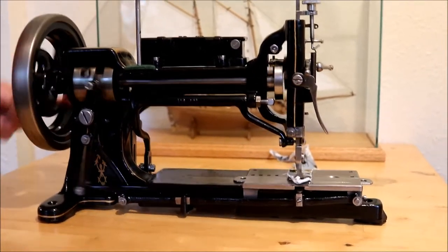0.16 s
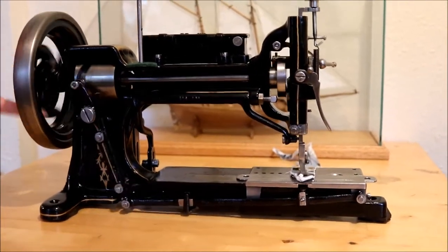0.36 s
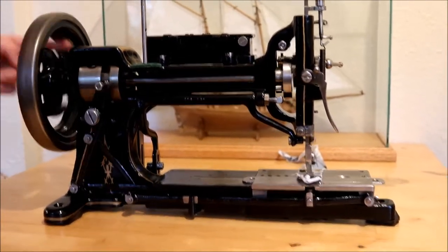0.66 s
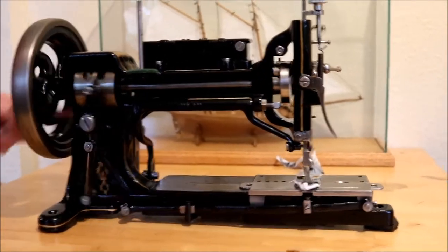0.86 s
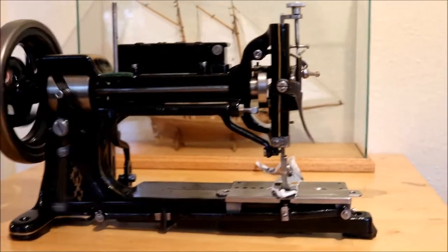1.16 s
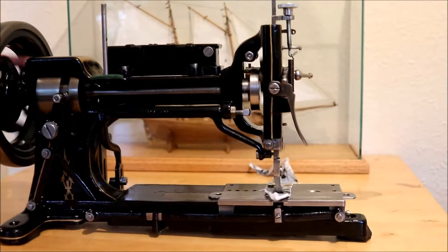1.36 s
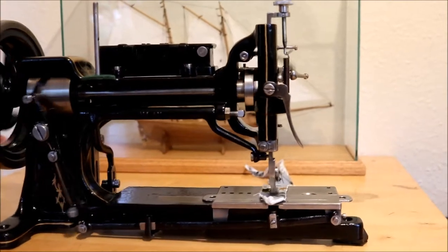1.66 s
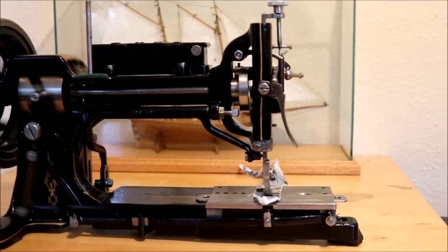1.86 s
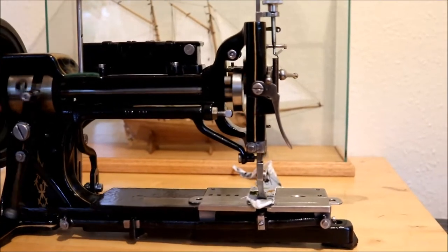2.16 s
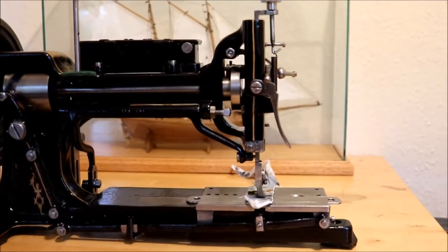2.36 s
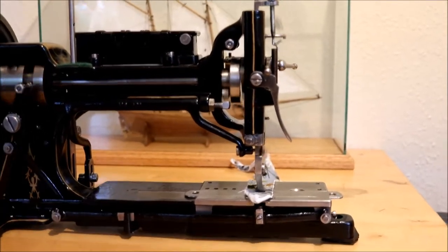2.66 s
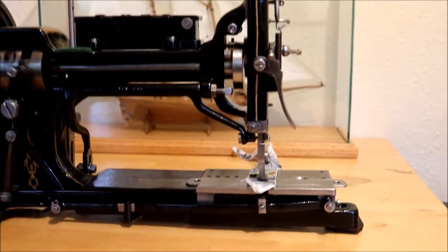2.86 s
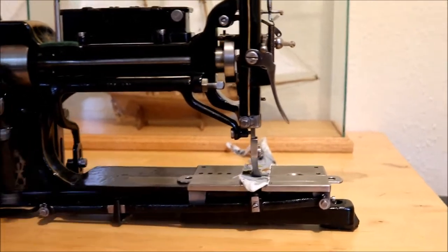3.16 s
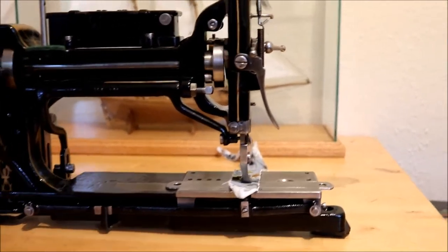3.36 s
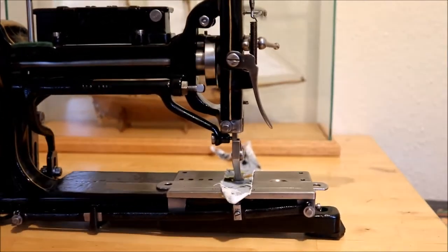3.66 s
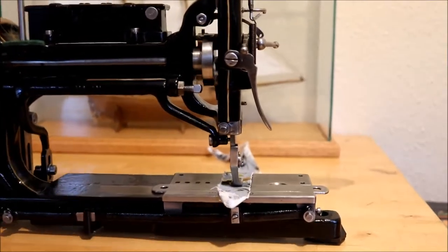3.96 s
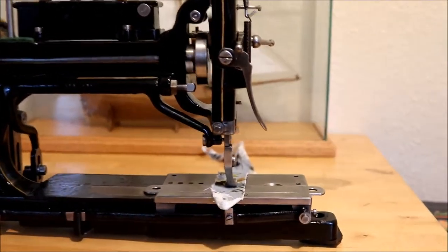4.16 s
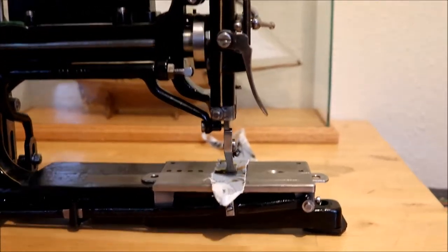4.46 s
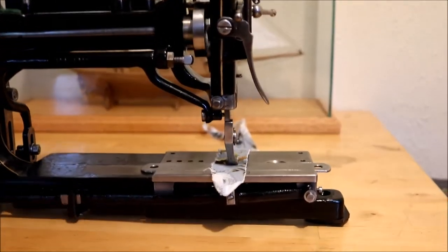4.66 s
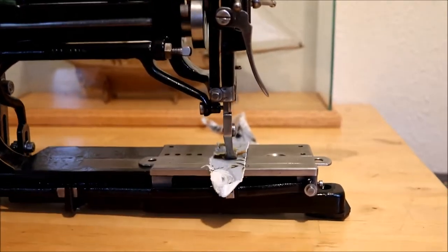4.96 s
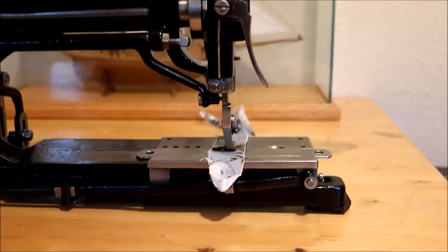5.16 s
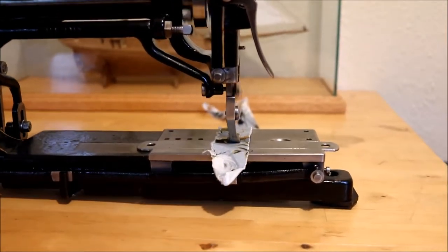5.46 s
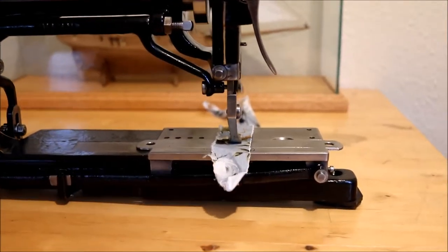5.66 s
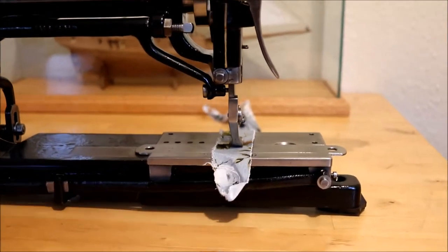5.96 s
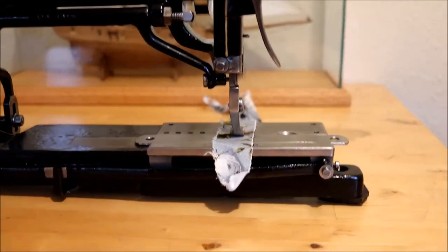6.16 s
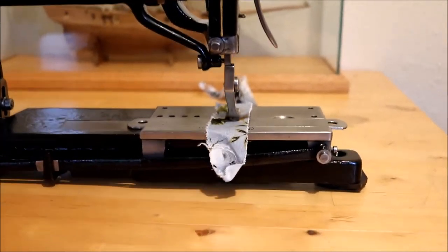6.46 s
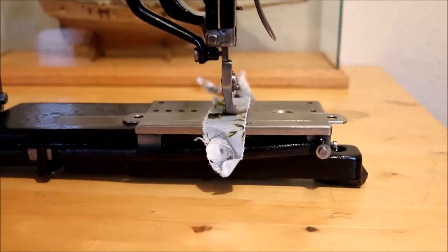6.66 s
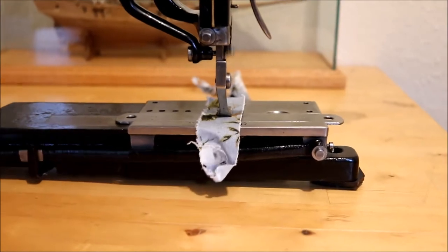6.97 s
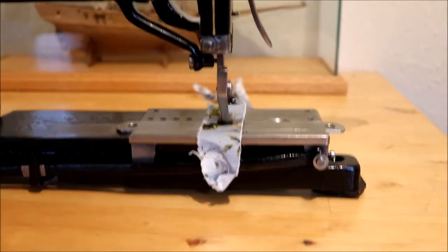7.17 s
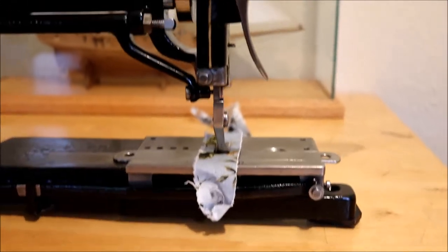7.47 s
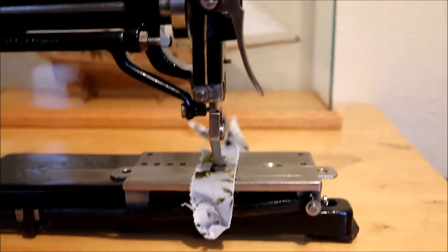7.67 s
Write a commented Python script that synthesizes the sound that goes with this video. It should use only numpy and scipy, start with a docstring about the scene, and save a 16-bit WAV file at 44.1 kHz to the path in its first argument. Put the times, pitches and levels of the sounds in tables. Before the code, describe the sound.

A hand-cranked cast-iron sewing machine turns steadily, each stitch a clack, ping, sharp click and low table thump over a soft whirring hum.

```python
"""Hand-cranked sewing machine

An old cast-iron machine runs on a wooden table, about one and a half stitches a second. Bearings hum and whirr
(filtered noise). In each turn the shuttle clacks, a small spring pings (sines), a cam catches, the feed shoves
frame and table into a low thump (ringing modes), and the foot drops back; loose joints tick and levers knock.
Clicks are short noise bursts with a tone colour. A close stereo microphone hears it in a small room."""
import sys
import numpy as np
from scipy import signal
from scipy.fft import rfft, irfft
from scipy.io import wavfile
from scipy.ndimage import uniform_filter1d, map_coordinates

SR = 44100
rng = np.random.default_rng(int(sys.argv[2]) if len(sys.argv) > 2 else 0)


def generate_wav(sig):
    """Save sig (samples, or channels by samples) to the path in sys.argv[1] as 16-bit PCM at SR."""
    pcm = np.round(np.clip(np.atleast_2d(sig).T, -1, 1) * 32767).astype(np.int16)
    wavfile.write(sys.argv[1], SR, pcm)


N = 343980
TIME = np.arange(N) / SR

# ways in which frame and table ring:
# (frequency [Hz], time to fade by 60 dB [s], level under the feed [dB], level under the foot [dB])
BODY_MODES = [(105.5, 0.23, -6, -5.5), (139.3, 0.17, 7.5, -8), (158.1, 0.37, -16, -9),
              (237.3, 0.23, -7, -20.5), (274, 0.17, -42, -14), (301.3, 0.3, -24.5, -16.5),
              (332.3, 0.148, -33, -12.5), (382.5, 0.31, -26.5, -61), (498.3, 0.2, -29, -52),
              (689.2, 0.21, -21, -19.5), (721.2, 0.084, -20, -33), (772, 0.055, -19.5, -7),
              (831.2, 0.16, -21.5, -15.5), (1252, 0.088, -46, -28), (1514, 0.057, -31.5, -32),
              (1914, 0.089, -23.5, -29), (2272, 0.071, -28, -19), (2849, 0.173, -30.5, -28)]
# colour of oiled parts rubbing or knocking: (frequency [Hz], level [dB])
RUBBING_TONE = [(150, -5.5), (380, -1.5), (450, 0.5), (600, 1), (700, 2), (850, 9), (1030, -5.5),
                (1450, 1.5), (1700, -5.5), (1950, -0.5), (3300, -12.5), (4600, -13.5), (8000, -21.5),
                (16000, -28)]
# one turn of the hand wheel for each stitch: (shuttle strike time [s], wait for the cam [s],
# wait from cam to foot [s], shuttle level [dB], spring ring level [dB])
STITCH_TURNS = [(0.077, .2014, .1699, -24.5, -7), (0.7663, .1931, .1645, -21, -9),
                (1.4395, .1714, .1644, -21, -2), (2.085, .1909, .1656, -20, -1),
                (2.7584, .1976, .1724, -20, 3), (3.4625, .2088, .1825, -23.5, -4),
                (4.1994, .2051, .1701, -22, -3), (4.8964, .1932, .1597, -19, -6),
                (5.5584, .1895, .1643, -18.5, 0), (6.225, .1905, .1629, -18.5, 6),
                (6.8838, .1859, .1567, -18.5, 8), (7.524, .1782, .155, -19.5, 6)]

# the parts are geared to the wheel and act at fixed angles after the shuttle's strike (turns)
SPRING_ANGLE, CAM_ANGLE, FEED_ANGLE, FOOT_ANGLE = .082, .285, .305, .53
# strength of each blow half way through the run, before the part's own gain (dB)
SPRING_DB, CAM_DB, FEED_DB, FOOT_DB = -30, -17.5, -22.5, -20
FEED_THUMP_DB, FOOT_THUMP_DB = -15, -20.5
# the hand slowly drives harder: change of the clicks and of the thumps over the run (dB)
CLICK_RISE_DB, THUMP_RISE_DB = 2, -0.1


def undb(db):
    """Decibels to gain."""
    return 10 ** (np.asarray(db) / 20)


def unit(x):
    """Scale to rms 1."""
    return x / np.sqrt(np.mean(x ** 2))


def along(points, hz):
    """Read (Hz, value) points on a log-frequency axis."""
    f, value = np.transpose(points)
    return np.interp(np.log(hz + 1), np.log(f), value)


def convolve(x, response):
    """Pass sound through a response, keeping the scene's length."""
    return signal.fftconvolve(np.atleast_2d(x), np.atleast_2d(response), axes=1)[:, :N]


def tone(points, size=8192):
    """A response of unit energy with the given colour that starts at once, with no ringing beforehand."""
    hz = np.arange(size // 2 + 1) * SR / size
    cepstrum = irfft(np.log(undb(along(points, hz))))
    # folding the second half onto the first puts the energy as early as possible
    cepstrum[1:size // 2] *= 2
    cepstrum[size // 2 + 1:] = 0
    response = irfft(np.exp(rfft(cepstrum)))
    return response / np.linalg.norm(response)


def add(out, s, sound):
    """Mix a sound in at time s."""
    i = max(int(s * SR), 0)
    part = out[..., i:i + sound.shape[-1]]
    part += sound[..., :part.shape[-1]]


def walk(rate):
    """Smooth random drift with a spread near 1, taking a new value rate times a second."""
    k = max(int(SR / rate), 1)
    steps = np.repeat(rng.standard_normal(N // k + 1), k)
    return 1.2 * uniform_filter1d(steps, k)[:N]


def stereo(mid, side, side_db):
    """Left and right from a shared and an opposed part."""
    opposed = side * np.array([[1], [-1]])
    return (mid + undb(side_db) * opposed) / np.hypot(1, undb(side_db))


def wheel():
    """The wheel's progress as (times s, angles in turns); it runs on before and after."""
    times = np.cumsum(np.array(STITCH_TURNS)[:, :3], axis=1)
    times = np.vstack([2 * times[0] - times[1], times, 2 * times[-1] - times[-2]])
    angles = np.arange(-1, len(STITCH_TURNS) + 1)[:, None] + [0, CAM_ANGLE, FOOT_ANGLE]
    return times.ravel(), angles.ravel()


def passes(angle):
    """The moments at which the wheel passes an angle, one for each stitch."""
    times, angles = wheel()
    return np.interp(np.arange(len(STITCH_TURNS)) + angle, angles, times)


def drive(s):
    """The hand's effort, growing evenly from -.5 to .5."""
    return s / TIME[-1] - .5


def hurry():
    """How much faster than usual the wheel is turning, in tenths."""
    strikes = passes(0)
    speed = 1 / np.diff(strikes)
    midway = (strikes[1:] + strikes[:-1]) / 2
    return 10 * (np.interp(TIME, midway, speed) / speed.mean() - 1)


def blows(angle, click_db, thump_db=0):
    """A part strikes once a turn, its level following the effort: rows of (s, click dB, thump dB)."""
    s = passes(angle)
    return np.c_[s, click_db + CLICK_RISE_DB * drive(s), thump_db + THUMP_RISE_DB * drive(s)]


def loose_blows(parts, scatter_db):
    """Loose parts (angle, dB) strike once a turn with random strength: rows of (s, dB)."""
    rows = np.vstack([blows(angle, db) for angle, db in parts])
    return np.c_[rows[:, 0], rows[:, 1] + scatter_db * rng.standard_normal(len(rows))]


def chatter(contact_s, size=1024):
    """Steel meeting steel: a burst of tiny impacts with a flattened spectrum, rms 1 over 5 ms."""
    age = np.arange(size) / SR / contact_s
    spectrum = rfft(rng.standard_normal(size) * age * np.exp(-age))
    flattened = spectrum / (np.abs(spectrum) + 1e-12) ** .7
    burst = irfft(flattened)[:size // 2]
    return burst / np.linalg.norm(burst) * np.sqrt(.005 * SR)


def clicks(rows, colour, contact_s, gain_db, side_db, rebound_s, rebound_db):
    """Each blow chatters, rebounds once and rings the part that is struck."""
    force = np.zeros((2, N))
    for s, db, *_ in rows:
        strike = stereo(chatter(contact_s), chatter(contact_s), side_db)
        add(force, s, undb(db) * strike)
        late, size = rng.standard_normal(2)
        bounce = stereo(chatter(contact_s), chatter(contact_s), side_db)
        bounce_s = s + rebound_s * (1 + .15 * late)
        bounce_db = db + min(rebound_db + 2 * size, -2)
        add(force, bounce_s, undb(bounce_db) * bounce)
    return undb(gain_db) * convolve(force, tone(colour))


def thumps(rows, mode_db, delay_s, push_cycles, gain_db, scatter_db):
    """A shove builds up each body mode over its cycles; neighbours swing opposite ways, so it swells and beats."""
    t = np.arange(SR // 2) / SR
    hz, t60 = np.array(BODY_MODES).T[:2, :, None]
    sign = (-1) ** np.arange(len(BODY_MODES))[:, None]
    build_up = 1 - np.exp(-(t * hz / push_cycles) ** 2)
    envelope = build_up * np.exp(-np.log(1000) * t / t60)
    out = np.zeros(N)
    for s, _, db in rows:
        detune, size = rng.standard_normal((2, len(BODY_MODES), 1))
        swing = np.sin(2 * np.pi * hz * (1 + 0.0033 * detune) * t)
        strength = sign * undb(mode_db[:, None] + scatter_db * size)
        ring = (strength * envelope * swing).sum(0)
        # the first 50 ms set the level
        add(out, s + delay_s, undb(db + gain_db) * ring / np.std(ring[:SR // 20]))
    return out


def frame_ring(x, mode_db):
    """The frame's modes, kept ringing by whatever shakes them."""
    t = np.arange(SR // 3) / SR
    hz, t60 = np.array(BODY_MODES).T[:2, :, None]
    modes = undb(mode_db[:, None]) * np.sin(2 * np.pi * hz * t) * np.exp(-np.log(1000) * t / t60)
    return convolve(x, modes.sum(0))


def light_touch(corner_hz, slope_db):
    """A light contact hardly moves the heavy low modes: dB for each mode, slope_db per octave."""
    return slope_db * np.minimum(np.log2(np.array(BODY_MODES)[:, 0] / corner_hz), 0)


def load():
    """Rumble and rubbing in dB: each stroke adds a smooth swell to the free-running level."""
    # strokes that load the bearings once a turn:
    # (angle [turns], half width [turns], rumble level [dB], rubbing level [dB])
    loading_strokes = [(0.086, 0.032, -31, -39), (.262, 0.0158, -27, -44), (.415, 0.021, -21, -35.5),
                       (.52, 0.058, -23.5, -40.5), (0.842, 0.042, -29, -48.5)]
    turn = np.interp(TIME, *wheel())
    # power of the bearings running free, before their gains
    rumble, rub = undb(-35) ** 2, undb(-41.5) ** 2
    for angle, width, rumble_db, rub_db in loading_strokes:
        away = (turn - angle + .5) % 1 - .5
        swell = np.exp(-(away / width) ** 2)
        rumble = rumble + swell * undb(rumble_db) ** 2
        rub = rub + swell * undb(rub_db) ** 2
    return 10 * np.log10(rumble), 10 * np.log10(rub)


def bearings(rumble_db, rub_db, grain_db, flutter_db, effort_db, sing_db):
    """Shafts and slides rub with the load of each turn: a hum in the table and a gritty whirr above it."""
    # colour of the hum: (frequency [Hz], level [dB])
    hum_tone = [(30, -60.5), (75, -56), (95, -14), (107, -6), (120, -18.5), (138, 2.5), (156, 4),
                (175, -22), (230, -15), (330, -20), (450, -28), (900, -66)]
    hum_db, whirr_db = load()
    # a wheel turning a tenth faster makes the hum 1.5 dB louder
    effort = effort_db * drive(TIME) + 1.5 * hurry()
    hum = convolve(stereo(*rng.standard_normal((2, N)), side_db=-27), tone(hum_tone))
    # the load, not chance, sets its strength
    hum = hum / np.sqrt(uniform_filter1d(np.mean(hum ** 2, axis=0), SR // 12))
    grit = undb(grain_db * walk(500) + flutter_db * walk(45))
    scrape = grit * stereo(*rng.standard_normal((2, N)), side_db=-7.5)
    whirr = unit(convolve(scrape, tone(RUBBING_TONE)))
    singing = frame_ring(whirr, np.array(BODY_MODES)[:, 2] + light_touch(2100, 9.3))
    whirr = whirr + undb(sing_db) * unit(singing)
    # effort changes the whirr less than the hum
    return hum * undb(hum_db + rumble_db + effort) + whirr * undb(whirr_db + rub_db + 0.43 * effort)


def uneven(x, low_hz, high_hz, swing_db):
    """The touching spots keep changing, so four bands of the rubbing swell independently."""
    edges = np.geomspace(low_hz, high_hz, num=5)
    out = x
    for lo, hi in zip(edges, edges[1:]):
        band_filter = signal.butter(1, [lo, hi], "band", fs=SR, output="sos")
        band = signal.sosfiltfilt(band_filter, x)
        out = out + band * (undb(swing_db * walk(22)) - 1)
    return out


def shuttle(scuff_s, scuff_db):
    """The shuttle scuffs along its race just before it strikes the end."""
    # colour of the clack: (frequency [Hz], level [dB])
    clack_tone = [(400, -29), (2300, -16.5), (3000, -2), (3400, -10), (4350, 2), (5150, -14.5), (6200, -6),
                  (7300, -13.5), (9000, -8), (10000, -12.5), (12800, -10.5), (14600, -2), (16000, -15)]
    strikes = np.array(STITCH_TURNS)[:, ::3]  # time and shuttle level
    early = strikes - [scuff_s, 0]
    scuff = clicks(early, clack_tone, contact_s=0.0025, gain_db=scuff_db, side_db=-3,
                   rebound_s=0.012, rebound_db=-3)
    return scuff + clicks(strikes, clack_tone, contact_s=0.00058, gain_db=0.5, side_db=-10.5,
                          rebound_s=0.04, rebound_db=-28)


def spring(ring_hz, ring_width_hz, ring_t60, ring_db):
    """A light tap that leaves a cluster of close wire modes singing."""
    # colour of the tap: (frequency [Hz], level [dB])
    tap_tone = [(1000, -21), (3000, -37), (4900, -7), (6700, -12), (7330, 3.5), (7900, -5.5), (9200, -14),
                (9900, -3), (11000, -17.5), (11800, -11.5), (16000, -31.5)]
    taps = blows(SPRING_ANGLE, SPRING_DB)
    out = clicks(taps, tap_tone, contact_s=0.00108, gain_db=2.0, side_db=3.0,
                 rebound_s=0.012, rebound_db=-8.5)
    t = np.arange(SR // 3) / SR
    hz = ring_hz + ring_width_hz * np.linspace(-.5, .5, num=5)[:, None]
    fade = (1 - np.exp(-t / .0005)) * np.exp(-np.log(1000) * t / ring_t60)
    for (s, db, _), (*_, sing_db) in zip(taps, STITCH_TURNS):
        # each microphone hears the wire from its own angle
        phase = rng.random((2, len(hz), 1))
        ring = np.sin(2 * np.pi * (hz * t + phase)).mean(1) * fade
        add(out, s, undb(db + sing_db + ring_db) * ring)
    return out


def cam():
    """The cam catches once a turn with a hard, bright click."""
    # colour of the catch: (frequency [Hz], level [dB])
    catch_tone = [(500, -54), (1500, -15.5), (3100, -1), (3500, -3.5), (4000, 9), (4450, 8), (4900, -2),
                  (5900, -3.5), (7400, -9.5), (8700, -5), (10300, -5), (12500, -5.5), (14500, -3),
                  (16000, 2)]
    return clicks(blows(CAM_ANGLE, CAM_DB), catch_tone, contact_s=0.00063, gain_db=1.5, side_db=-6.0,
                  rebound_s=0.0014, rebound_db=-4.0)


def feed_click(feed):
    """The feed's steel contact as it starts its shove."""
    # colour of the contact: (frequency [Hz], level [dB])
    contact_tone = [(300, -19), (800, -1), (1050, -4), (1500, 1), (2200, -4), (2950, 4.5), (3600, -1.5),
                    (4300, -2), (5100, -4.5), (5800, -1.5), (7500, -7.5), (11000, -10.5), (15500, -29)]
    return clicks(feed, contact_tone, contact_s=0.0014, gain_db=2.0, side_db=-8.5,
                  rebound_s=0.0059, rebound_db=-7)


def feed_thump(feed):
    """The feed shoves frame and table, then its lever knocks lightly at the end of its travel."""
    under_feed = np.array(BODY_MODES)[:, 2]
    shove = thumps(feed, under_feed, delay_s=0.00317, push_cycles=1.83, gain_db=0.5, scatter_db=2)
    end_stop = under_feed + light_touch(484, 19.3)
    return shove + thumps(feed, end_stop, delay_s=.059, push_cycles=2.5, gain_db=-23, scatter_db=3)


def judder(feed, start_s, length_s, gain_db, scatter_db, count):
    """The loaded feed judders along its stroke in small irregular knocks."""
    # colour of the knocks: (frequency [Hz], level [dB])
    knock_tone = [(120, -28), (240, 1.5), (300, 3.5), (380, -0.5), (440, -13.5), (505, 6), (590, -12),
                  (700, 0.5), (830, -4), (1000, -14), (2000, -27.5), (4000, -31), (12000, -42)]
    force = np.zeros(N)
    for s, _, db in feed:
        when = s + start_s + length_s * (np.arange(count) + rng.random(count)) / count
        for t, size in zip(when, rng.standard_normal(count)):
            add(force, t, undb(db + gain_db + scatter_db * size) * chatter(0.00038))
    return convolve(force, tone(knock_tone))


def linkage():
    """Loose joints tick in every turn and sometimes snag; each tick mixes a rattle with a sharp edge."""
    # joints whose play is taken up once a turn: (angle [turns], rattle level [dB], sharp edge level [dB])
    joints = np.array([(.339, -32, -53), (0.411, -44, -39.5), (0.564, -34.5, -34), (.818, -31.5, -50)])
    # now and then a joint snags: (time [s], rattle level [dB], sharp edge level [dB])
    snags = np.array([(1.6002, -34, -40), (2.9234, -33.5, -39), (5.0593, -29.5, -38), (5.8308, -37, -37),
                      (6.1383, -39, -43), (6.7771, -49, -38), (7.0414, -29, -48), (7.142, -48, -33),
                      (7.4458, -28.5, -48)])
    # colours of the rattle and of the sharp edge: (frequency [Hz], level [dB])
    rattle_tone = [(400, 1.5), (1400, 7), (2300, 10), (3500, 0), (4600, -5.5), (7000, -23), (16000, -26.5)]
    edge_tone = [(3000, 3), (7000, 1), (9500, -3), (12500, -6), (16000, -12)]
    rattles = np.vstack([loose_blows(joints[:, :2], scatter_db=3), snags[:, :2]])
    edges = np.vstack([loose_blows(joints[:, ::2], scatter_db=6), snags[:, ::2]])
    rattle = clicks(rattles, rattle_tone, contact_s=0.00068, gain_db=-4.0, side_db=-5,
                    rebound_s=0.011, rebound_db=-17)
    return rattle + clicks(edges, edge_tone, contact_s=0.00114, gain_db=-1, side_db=6,
                           rebound_s=0.009, rebound_db=-13)


def foot_click(foot):
    """The foot drops back: a very short steel contact with a strong, quick rebound."""
    # colour of the contact: (frequency [Hz], level [dB])
    drop_tone = [(300, -27), (1300, -6.5), (1700, -18.5), (2300, -7), (3700, -9.5), (4200, 1.5), (4800, -8),
                 (5600, -5.5), (6700, -9), (8200, -11), (9500, -4.5), (12000, -13.5), (14300, -8),
                 (16000, -14.5)]
    return clicks(foot, drop_tone, contact_s=0.00024, gain_db=2, side_db=-7.0,
                  rebound_s=0.002, rebound_db=-0.5)


def foot_thump(foot):
    """The dropping foot sets frame and table ringing."""
    under_foot = np.array(BODY_MODES)[:, 3]
    return thumps(foot, under_foot, delay_s=0.00118, push_cycles=1.0, gain_db=-1.5, scatter_db=1.5)


def levers(gain_db, corner_hz, slope_db):
    """Levers reverse with a soft, oiled knock that rings the frame's middle modes."""
    # where each lever reverses: (angle [turns], level [dB])
    reversals = [(.665, -41), (.768, -49.5), (.82, -41), (.87, -43.5), (.908, -43)]
    knocks = clicks(loose_blows(reversals, scatter_db=2), RUBBING_TONE, contact_s=0.0025, gain_db=-2,
                    side_db=-18, rebound_s=0.006, rebound_db=-4.5)
    ring = frame_ring(knocks, np.array(BODY_MODES)[:, 2] + light_touch(corner_hz, slope_db))
    return knocks + undb(gain_db) * np.std(knocks) * unit(ring)


def room(x, near_db, near_t60, far_db, onset_s):
    """Quick reflections between frame and table top, then the tail of the small room."""
    # how long the room rings: (frequency [Hz], time to fade by 60 dB [s])
    fade_times = [(200, 0.85), (1000, 0.34), (4000, 0.34), (9000, 0.22), (16000, 0.24)]
    # colour of the tail: (frequency [Hz], level [dB])
    tail_tone = [(500, 5.5), (2300, 2), (3200, -0.5), (4200, -4), (5300, -0.5), (7000, 1.5), (10000, 0),
                 (16000, -3)]
    t = np.arange(SR // 2) / SR
    hz = np.arange(len(t) // 2 + 1) * SR / len(t)
    noise = rfft(rng.standard_normal((2, len(t))))
    tail = 0
    for (_, t60), band in zip(fade_times, np.eye(len(fade_times))):
        weight = along(np.c_[np.array(fade_times)[:, 0], band], hz)
        tail = tail + irfft(noise * weight, len(t)) * np.exp(-np.log(1000) * t / t60)
    tail = convolve(tail * (1 - np.exp(-t / onset_s)), tone(tail_tone))[:, :len(t)]
    near = rng.standard_normal((2, len(t))) * np.exp(-np.log(1000) * t / near_t60) * (t > .0015)
    response = sum(undb(db) * r / np.linalg.norm(r[0]) for r, db in ((near, near_db), (tail, far_db)))
    return convolve(x, response)


def shifting_room(x, count):
    """The reflections change as the microphone moves, each pattern fading into the next."""
    place = TIME / TIME[-1] * (count - 1)
    shares = np.sqrt(np.maximum(1 - np.abs(place - np.arange(count)[:, None]), 0))
    return sum(room(x * share, near_db=-6.5, near_t60=0.087, far_db=-8.5, onset_s=0.0076)
               for share in shares)


def approach(x, treble_hz, start_db, end_db, lag_s):
    """The microphone drifts towards the needle: more treble, and the sound reaches the left side first."""
    way = TIME / TIME[-1]
    treble_filter = signal.butter(1, treble_hz, "high", fs=SR, output="sos")
    treble = signal.sosfiltfilt(treble_filter, x)
    left, right = x + treble * (undb(start_db + (end_db - start_db) * way) - 1)
    # the lag grows over the first half, then holds
    lag = lag_s * SR * np.minimum(2 * way, 1)
    return np.array([left, map_coordinates(right, [np.arange(N) - lag], order=5)])


def scene():
    """All the parts of the running machine; only the steel clicks are echoed by the room."""
    rubbing = bearings(rumble_db=-2.0, rub_db=-2.0, grain_db=1.5, flutter_db=2.5, effort_db=4.5, sing_db=-14.5)
    rubbing = uneven(rubbing, low_hz=463, high_hz=4600, swing_db=3.0)
    feed = blows(FEED_ANGLE, FEED_DB, FEED_THUMP_DB)
    foot = blows(FOOT_ANGLE, FOOT_DB, FOOT_THUMP_DB)
    steel = shuttle(scuff_s=0.0044, scuff_db=-13)
    steel += spring(ring_hz=7300, ring_width_hz=370, ring_t60=0.07, ring_db=4.0)
    steel += cam()
    steel += feed_click(feed)
    steel += linkage()
    steel += foot_click(foot)
    body = feed_thump(feed) + foot_thump(foot)
    body = body + judder(feed, start_s=0.011, length_s=.1, gain_db=-19, scatter_db=1.5, count=9)
    body = body + levers(gain_db=2, corner_hz=700, slope_db=13)
    echo = shifting_room(steel, count=4)
    return approach(steel + body + rubbing + echo, treble_hz=5970, start_db=-4.0, end_db=-0.5, lag_s=.00002)


def record(dry):
    """The two microphones differ in colour; the top is cut off above 15.8 kHz."""
    # the right microphone faces the needle end and hears more treble:
    # (frequency [Hz], right minus left level [dB])
    right_tilt = [(250, -1), (1500, 0), (2900, 3), (4200, 0.5), (6200, 1), (8500, 0), (11000, 1.5),
                  (14000, 5.5)]
    tilt_db = along(right_tilt, np.arange(N // 2 + 1) * SR / N)
    heard = irfft(rfft(dry) * undb(tilt_db * np.array([[-.5], [.5]])), N)
    top_cut = signal.ellip(8, .2, 70, 15800, fs=SR, output="sos")
    return signal.sosfilt(top_cut, heard)


dry = scene()
out = record(dry)
generate_wav(out)
```